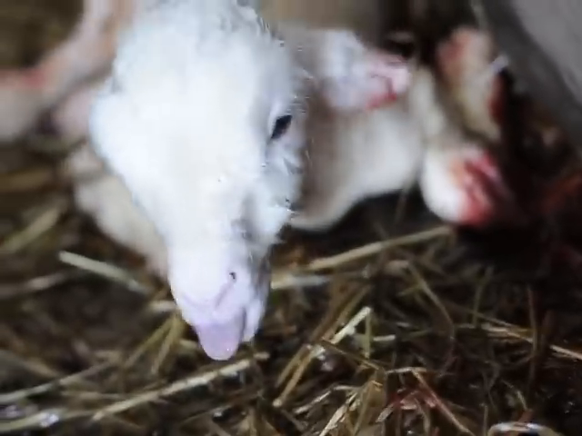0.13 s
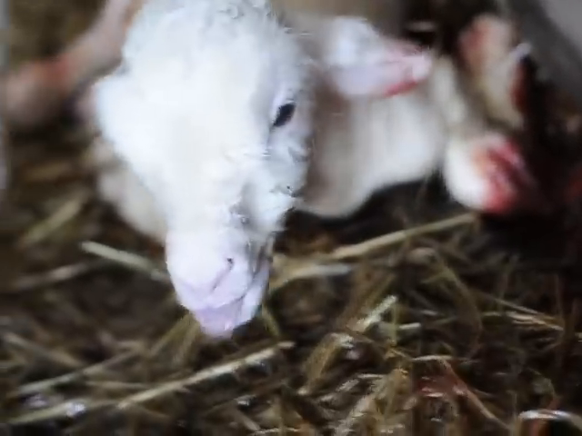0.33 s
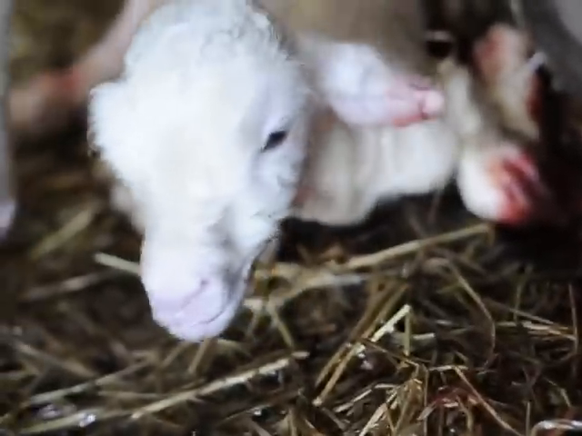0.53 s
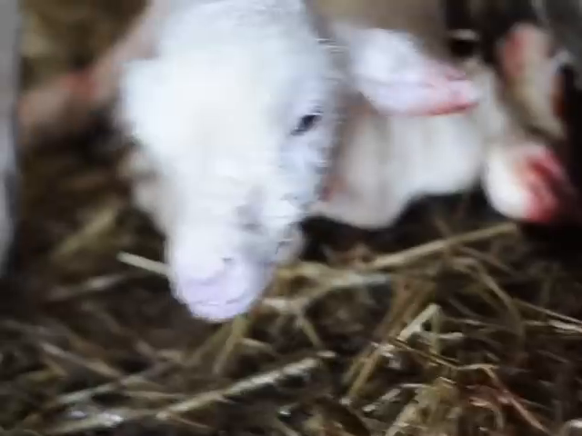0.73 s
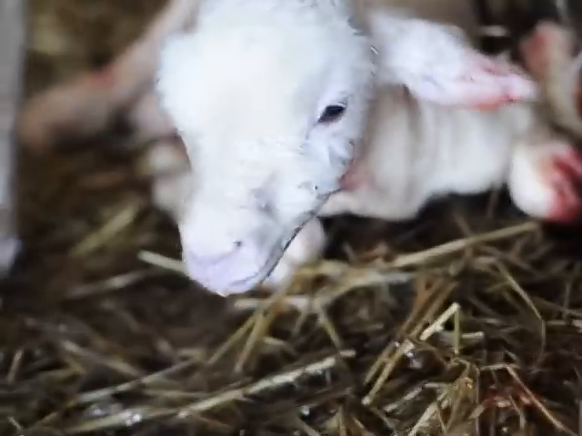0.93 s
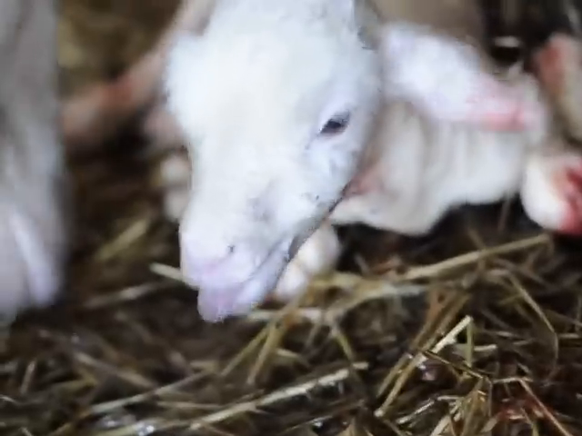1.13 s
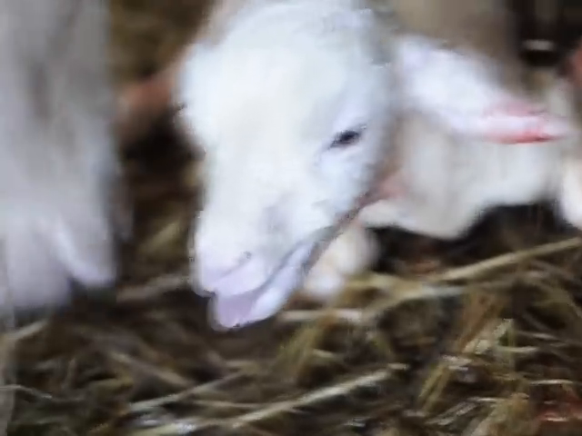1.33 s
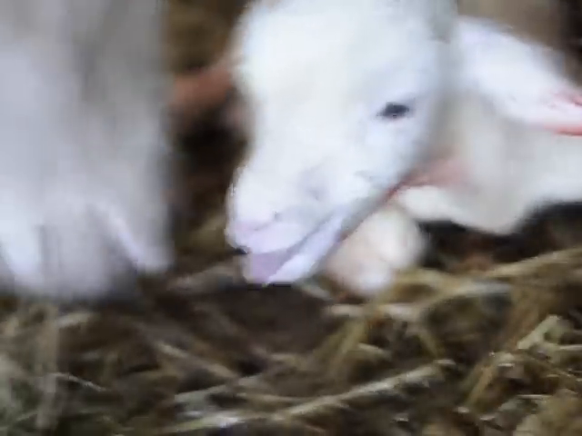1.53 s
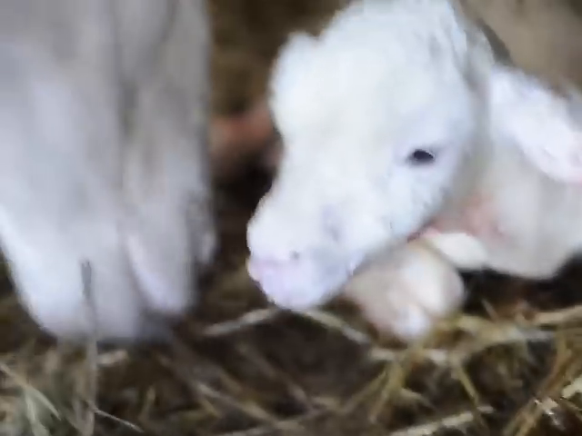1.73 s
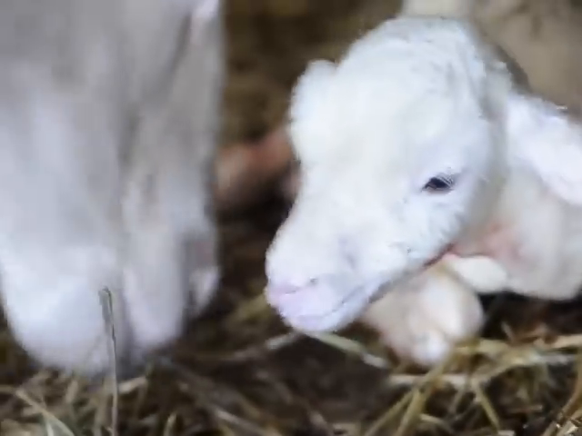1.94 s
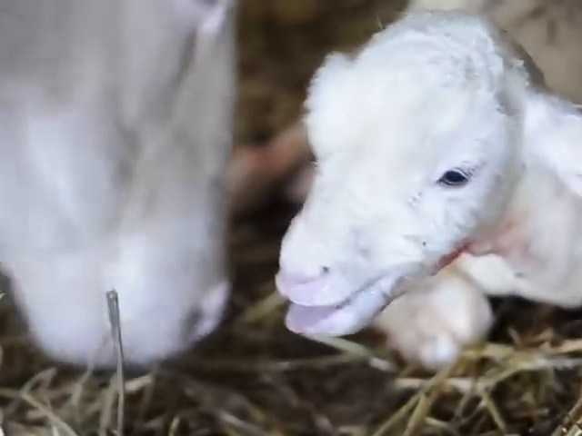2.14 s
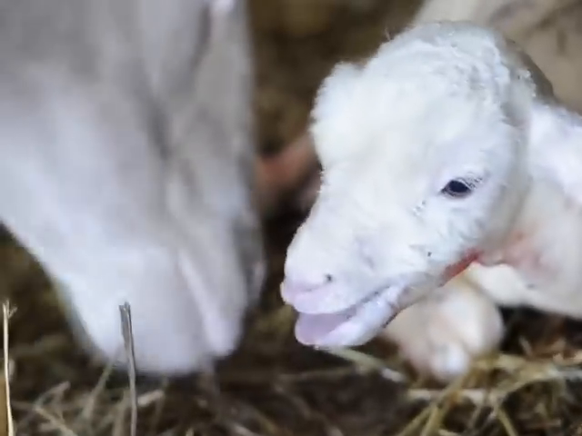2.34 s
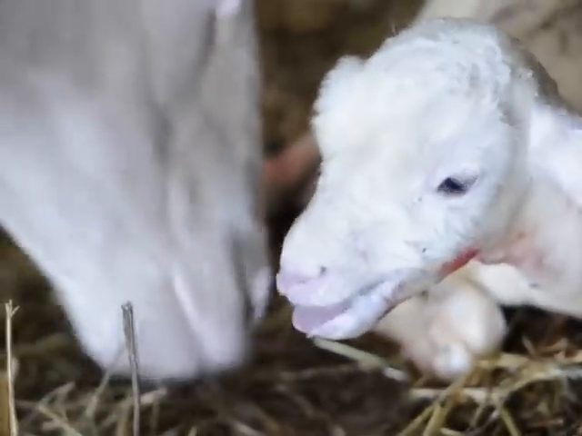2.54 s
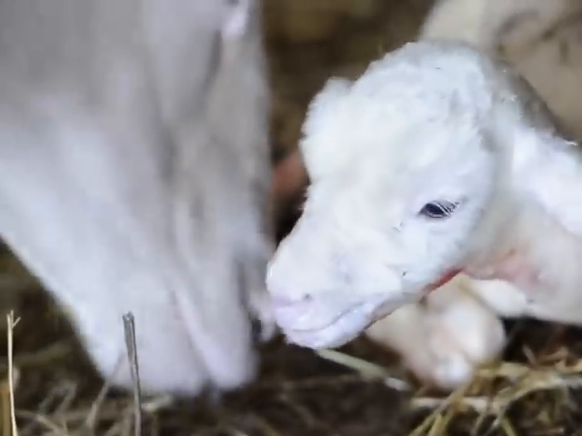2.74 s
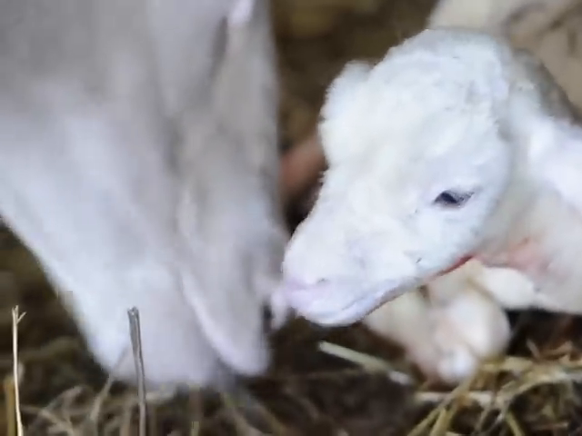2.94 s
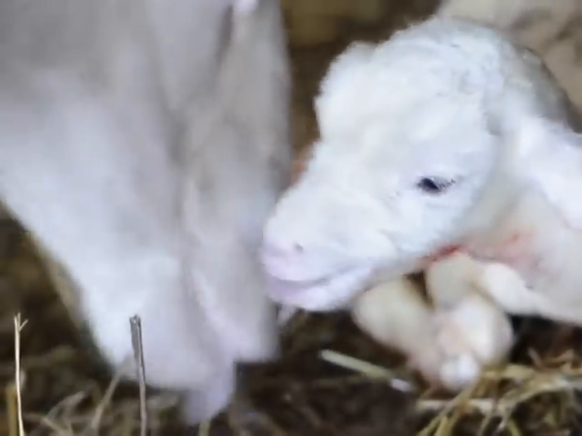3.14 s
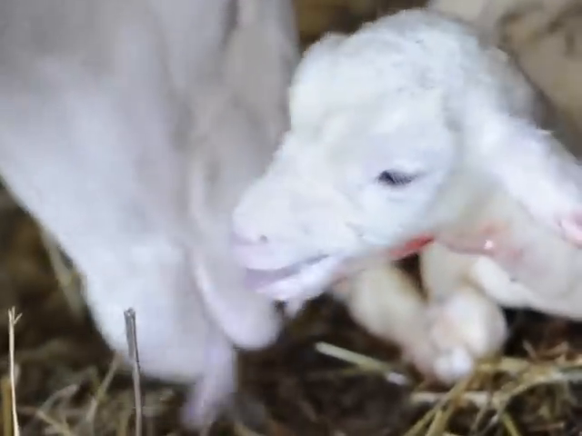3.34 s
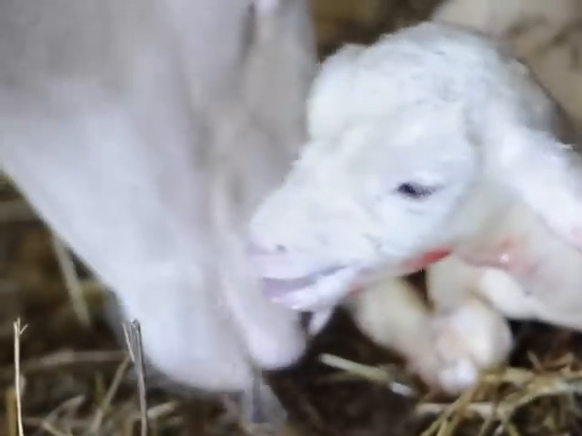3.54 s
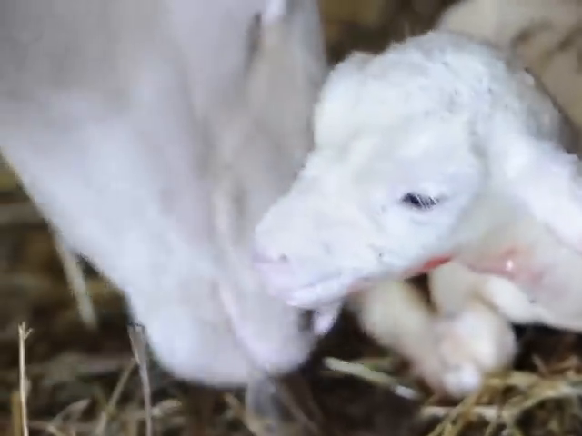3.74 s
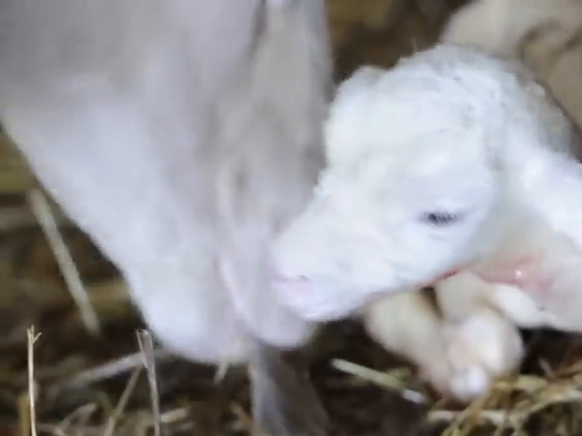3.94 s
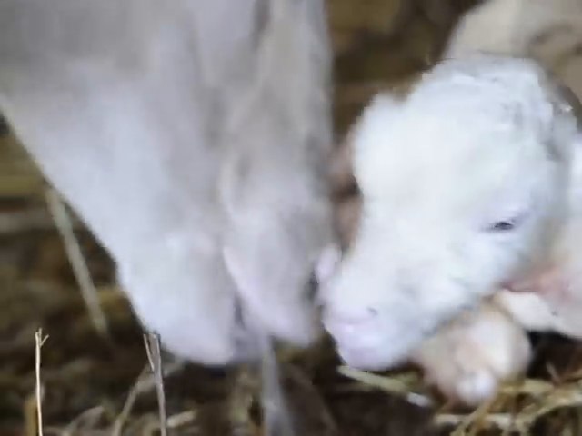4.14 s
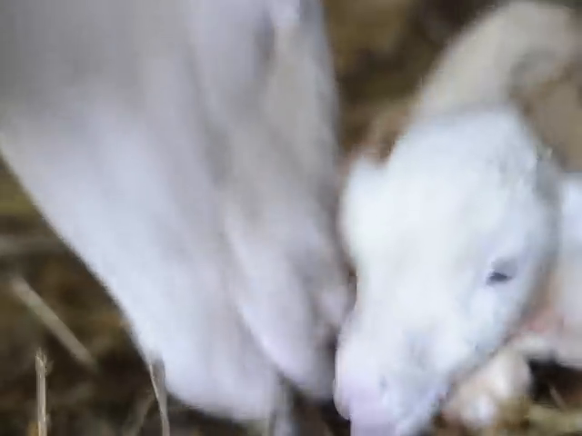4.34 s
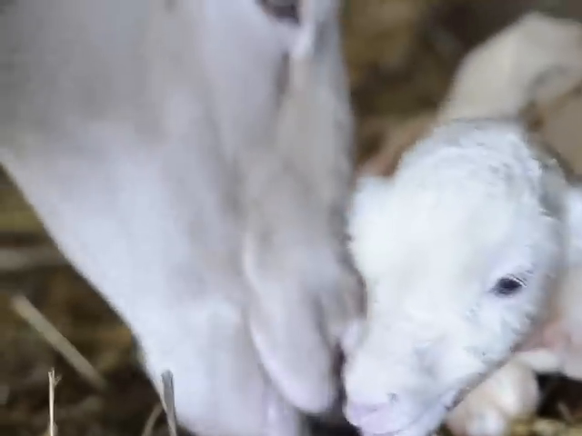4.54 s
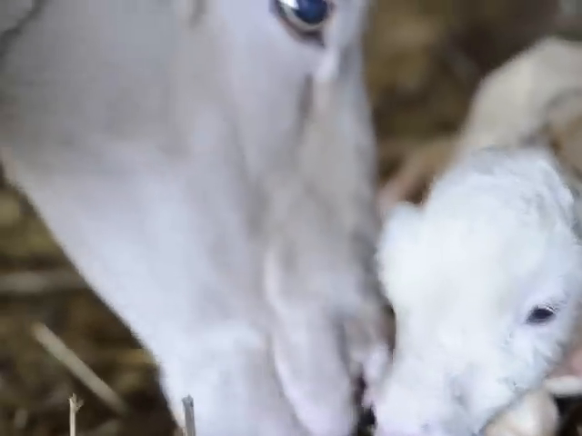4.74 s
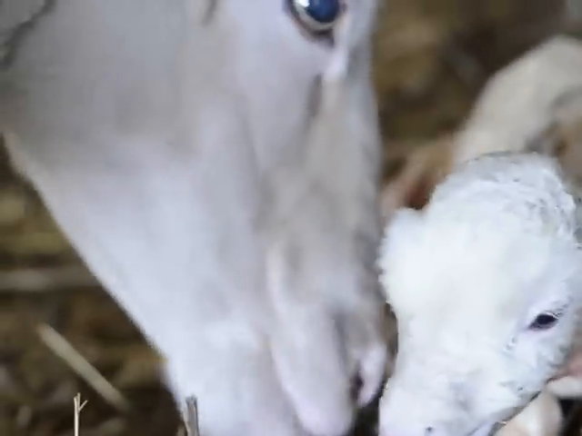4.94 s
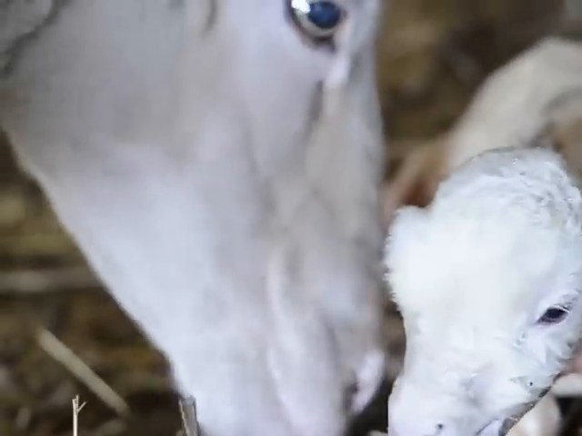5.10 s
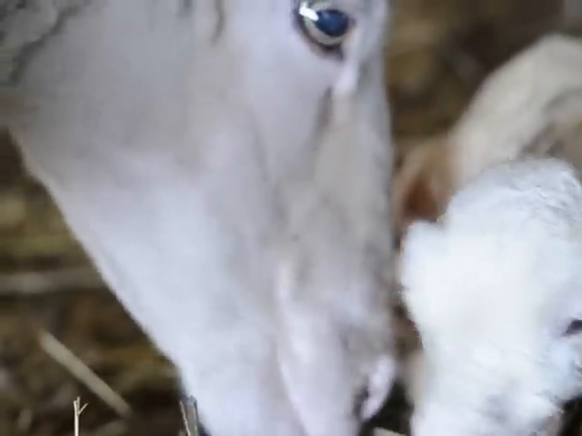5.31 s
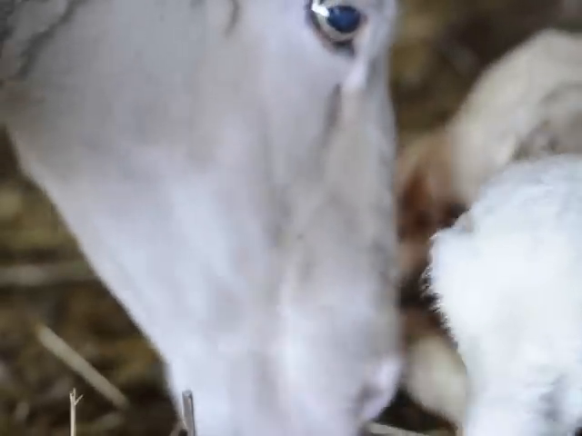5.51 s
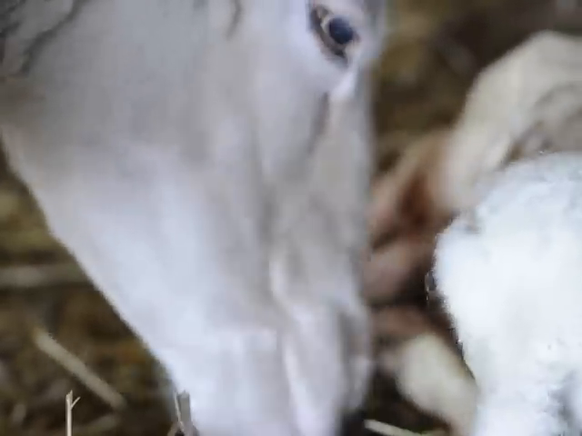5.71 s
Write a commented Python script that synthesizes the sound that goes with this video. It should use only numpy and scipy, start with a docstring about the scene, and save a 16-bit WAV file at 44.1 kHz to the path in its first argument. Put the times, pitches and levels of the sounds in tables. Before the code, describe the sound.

A close, centred view of a newborn lamb in a straw-floored barn, over quiet, dull noise that gently swells. The lamb is bleating at the start, a short cry until 0.35 seconds, fuller and lower in colour than the rest. Five more follow at about 1.05-1.6, 1.95-2.6, 2.95-3.6, 4.1-4.5 and 4.85-5.55 seconds. Each is high, around 400 to 440 hertz, nearly steady but slightly arched, bright and nasal, with creaky edges and breathy hiss. Wet mouth smacks and crisp snaps cluster at 0.4 and 0.85-0.9 seconds, then come lightly between bleats, around 1.7, 2.7, 2.9, 3.8, 4.6 and 5.7. Soft straw scuffs and fine crackle swell briefly around them. From 4.0 to 4.75 seconds a distant, lower sheep bleats once, faint and echoing, breaking into a rapid quaver as it fades beneath the lamb. Near sounds are almost dry.

```python
"""A barn: a newborn lamb lies in the straw and bleats six times, close by, over dull background noise.
Each bleat is an arched pulse train through a bright throat, rough as the voice starts and stops;
its breath hiss swells, or once thins slightly, around a set time. Straw rustles in filtered crackle and
mouths smack in short noise bursts as the ewe nuzzles the lamb. Far off, another sheep's lower pulse train
quavers once."""
import sys
import numpy as np
from scipy import signal
from scipy.fft import rfft, irfft
from scipy.io import wavfile
from scipy.ndimage import uniform_filter1d, map_coordinates

SR = 44100
rng = np.random.default_rng(int(sys.argv[2]) if len(sys.argv) > 2 else 0)


def to_wav(sig):
    """Store sig (one row per channel, or 1-D mono) as 16-bit WAV at the path in sys.argv[1].

    Samples outside -1..1 are clipped; the rate is SR.
    """
    pcm = np.clip(np.atleast_2d(sig), -1, 1) * 32767
    pcm = np.round(pcm).astype(np.int16)
    wavfile.write(sys.argv[1], SR, pcm.T)  # frames by channels


N = 254309

# bounds of the throat's five regions: [f/Hz]
REGION_EDGES_HZ = [1450, 2350, 4450, 6700]


def gain_of(db):
    """Decibels to gain."""
    return 10 ** (np.asarray(db) / 20)


def evened(x):
    """Scales to rms 1."""
    return x / np.sqrt(np.mean(x ** 2) + 1e-20)


def read(points, hz):
    """A spectrum's value at hz, on a log-frequency axis."""
    f, value = np.transpose(points)
    return np.interp(np.log(hz + 1), np.log(f + 1), value)


def follow(rows, t):
    """The columns of a curve table at times t."""
    s, *columns = np.transpose(rows)
    return [np.interp(t, s, column) for column in columns]


def add(mix, s, sound):
    """Adds a sound to the mix at time s."""
    part = mix[max(round(s * SR), 0):][:len(sound)]
    part += sound[:len(part)]


def bump(t, at_s, width_s):
    """A smooth swell of height 1 around at_s."""
    return np.exp(-((t - at_s) / width_s) ** 2)


def drift(size, hz):
    """Smooth chance of rms about 1, with a Gaussian roll-off at hz."""
    f = np.fft.rfftfreq(N, 1 / SR)
    spectrum = rfft(rng.standard_normal(N)) * np.exp(-(f / hz) ** 2)
    return evened(irfft(spectrum, N))[:size]


def waver(size, count, per_s):
    """Unrelated smooth wanderings through random knots, per_s knots a second."""
    knots = rng.standard_normal((count, int(N / SR * per_s) + 4))
    steps = np.arange(0, size + 200, 200)
    at_knot = [steps / SR * per_s]
    curves = [map_coordinates(row, at_knot, order=3, mode="nearest") for row in knots]
    return [np.interp(np.arange(size), steps, curve) for curve in curves]


def colour(x, points, size=4096):
    """Minimum-phase filter with the given spectrum: each pulse rings after it strikes."""
    log_gain = np.log(gain_of(read(points, abs(np.fft.fftfreq(size, 1 / SR)))))
    ring = np.fft.ifft(np.exp(np.conj(signal.hilbert(log_gain)))).real
    return signal.oaconvolve(x, ring[:size // 2])[:len(x)]


def band(x, lo_hz, hi_hz, order=2):
    """Band-pass, rms 1."""
    edges_hz = [lo_hz, min(hi_hz, SR / 2 - 1)]
    return evened(signal.sosfilt(signal.butter(order, edges_hz, "band", fs=SR, output="sos"), x))


def background(floor_db=-59.5, low_db=-2.0, high_db=-1.0):
    """Dull barn noise: the part below 700 Hz swells and sinks, the rest less so."""
    # spectrum: [f/Hz, relative density/dB per Hz]
    floor = [(20, -4), (40, -9.5), (62, -8.5), (150, -5), (250, -10.5), (450, -10.5), (800, -14),
             (1500, -18), (2000, -18.5), (3000, -20.5), (6000, -28), (10000, -31), (11500, -41),
             (13000, -52.5)]
    noise = gain_of(floor_db) * evened(colour(rng.standard_normal(N), floor))
    low = signal.sosfiltfilt(signal.butter(2, 700, fs=SR, output="sos"), noise)
    high = noise - low
    swell_db = 2.5 * drift(N, 9)
    return low * gain_of(low_db + swell_db) + high * gain_of(high_db + drift(N, 6))


def pulses(turns, count=36, wander=0.5, wander_per_s=8):
    """One sharp pulse a cycle; its shape wanders, so single harmonics swell and fade, high ones most."""
    along = waver(len(turns), count, wander_per_s)
    across = waver(len(turns), count, wander_per_s)
    out = 0
    for k, a, b in zip(range(1, count + 1), along, across):
        loose = wander * np.tanh(k / 10)
        angle = 2 * np.pi * k * turns
        out = out + (1 + loose * a) * np.cos(angle) + loose * b * np.sin(angle)
    return evened(out)


def hoarseness(t, creak, creak_s, rasp_db, change_s, change_db, end_creak=0.54, end_creak_s=0.014):
    """The folds creak until they catch and as they stop; the breath hiss swells or thins around change_s."""
    uncaught = bump((t - t[0]) ** 2, 0, creak_s ** 2)
    rough = creak * uncaught + end_creak * bump(t, t[-1], end_creak_s)
    return uncaught, rough, rasp_db + change_db * bump(t, change_s, 0.15)


def vowel_shares(effort_db, opening, uncaught, vowel, glide, ebb_scale_db=24):
    """Region shares/dB: weak voice is low and nasal, strong and open is bright; the vowel glides."""
    # per region, low to high: [shift as effort ebbs/dB, shift as jaw shuts/dB]
    region_shifts = [(13, 4), (15.5, -2.1), (1.6, -4.5), (-7, -3), (5.5, -0.5)]
    # shift per region, low to high, until the folds catch: [shift/dB]
    uncaught_shifts = [0.5, 2.5, -3.5, -1, -9]
    ebb = np.tanh((effort_db.max() - effort_db) / ebb_scale_db)
    late = np.linspace(-.5, .5, len(ebb))
    shares = []
    for db, glide_db, (ebb_db, shut_db), uncaught_db in zip(vowel, glide, region_shifts, uncaught_shifts):
        mouth_db = ebb_db * ebb + shut_db * (1 - opening)
        shares.append(db + glide_db * late + mouth_db + uncaught_db * uncaught)
    shares = np.array(shares)
    # the powers of the regions sum to 1
    return shares - 10 * np.log10((gain_of(shares) ** 2).sum(0))


def resonate(x, hz, width_hz):
    """A resonance of gain 1 that follows the curve hz."""
    turn = np.exp(2j * np.pi * np.cumsum(hz) / SR)
    r = np.exp(-np.pi * width_hz / SR)
    return 2 * (turn * signal.lfilter([1 - r], [1, -r], x / turn)).real


def regions(x, order=10):
    """Splits a voice into the throat's regions; they sum to the whole."""
    filters = [signal.butter(order, hz, fs=SR, output="sos") for hz in REGION_EDGES_HZ]
    below = [signal.sosfiltfilt(sos, x) for sos in filters]
    return np.diff([0 * x] + below + [x], axis=0)


def bleat(folds, effort, voicing, mouth, vowel, glide, throat, upper_throat,
          upper_db=-13, slack=2, attack_s=0.003, jitter=.0011, rough_jitter=.04,
          rough_noise=1.0, shimmer=0.52, straw_echo=0.032, flutter_db=0.57):
    """Pulses and puffs of turbulence ring the throat; its regions shift as the mouth opens."""
    # turbulence spectrum against the pulses: [f/Hz, relative level/dB]
    rasp_spectrum = [(300, -49.5), (1500, -26), (3000, -26.5), (5000, -19), (6200, -19), (7000, -11),
                     (10000, -15), (14000, -10.5)]
    # mouth's middle, high, top resonance: [width/Hz, boost/dB, f shut / f open]
    formant_shapes = [(447, 2.5, 0.7), (450, -8, 0.78), (698, 2.5, .86)]
    t = np.arange(effort[0][0], effort[-1][0], 1 / SR)
    n = len(t)
    hz, = follow(folds, t)
    effort_db, = follow(effort, t)
    uncaught, rough, rasp_db = hoarseness(t, *voicing)
    widest_s, jaw_s, *formants_hz = mouth
    opening = bump(t, widest_s, jaw_s)
    shares_db = vowel_shares(effort_db, opening, uncaught, vowel, glide)

    # the folds run steadily in mid-call and stumble at either end
    slow_jitter = jitter * drift(n, 39)
    fast_jitter = (jitter + rough_jitter * rough) * drift(n, 230)
    turns = np.cumsum(hz * (1 + slow_jitter + fast_jitter)) / SR
    puffs = evened((0.9 + np.exp(-(turns % 1) / 0.84)) * rng.standard_normal(n))
    rasp = colour(puffs, rasp_spectrum) * gain_of(rasp_db + 2 * drift(n, 23))
    drive = pulses(turns) * (1 + shimmer * rough * drift(n, 160)) + rasp + rough_noise * rough * puffs
    # slack folds flap softly, which strengthens the fundamental
    drive = drive + slack * rough * np.cos(2 * np.pi * turns)

    shape = [(k * np.median(hz), db) for k, db in throat]
    upper = [(f, db + upper_db) for f, db in upper_throat if f > REGION_EDGES_HZ[-1]]
    voice = colour(drive, [(120, shape[0][1] - 22)] + shape + upper)
    # the resonances rise as the jaw opens and sink as it closes
    for open_hz, (width_hz, boost_db, shut) in zip(formants_hz, formant_shapes):
        formant_hz = open_hz * (shut + (1 - shut) * opening)
        voice = voice + gain_of(boost_db) * resonate(voice, formant_hz, width_hz)
    # a reflection off the ground shifts with the head, so single harmonics swell and fade
    lag = (0.00159 + .00007 * drift(n, 7.3)) * SR  # samples
    voice = voice + straw_echo * map_coordinates(voice, [np.arange(n) - lag], order=3)

    # each region is levelled, then set by effort and share
    out = np.zeros(n)
    for part, share_db in zip(regions(voice), shares_db):
        strength = np.sqrt(abs(uniform_filter1d(part ** 2, size=1100)) + 1e-12)
        out += part / strength * gain_of(effort_db + share_db + flutter_db * drift(n, 30))
    return t[0], out * (1 - np.exp(-(t - t[0]) / attack_s)) * signal.windows.tukey(n, .012)


def lamb():
    """Six bleats, each with its own folds, effort, mouth and throat."""
    # vocal folds, one table a bleat: [t/s, pitch before jitter/Hz]
    folds = [
        [(0.008, 412.4), (0.092, 409.3), (0.2, 415), (0.304, 400.8), (0.328, 388.5), (0.34, 387)],
        [(1.05, 395), (1.062, 383), (1.098, 408.6), (1.172, 417.6), (1.37, 429.7), (1.474, 426.6),
         (1.542, 420.3), (1.582, 405.4), (1.595, 400.6)],
        [(1.968, 397), (1.972, 397), (2.018, 422.2), (2.11, 421.1), (2.156, 427.8), (2.31, 433.9),
         (2.518, 419.2), (2.568, 403)],
        [(2.975, 370), (2.993, 372), (3.005, 392.5), (3.043, 411.2), (3.187, 426.6), (3.403, 425.9),
         (3.469, 429), (3.527, 421.6), (3.588, 395.3)],
        [(4.1, 382.4), (4.112, 378.5), (4.16, 409), (4.254, 424.9), (4.37, 428), (4.408, 424.4), (4.485, 391)],
        [(4.848, 399), (4.856, 394), (4.884, 413.4), (4.924, 421.7), (5.078, 434.4), (5.264, 439.6),
         (5.332, 432.8), (5.442, 436), (5.506, 421), (5.545, 387.5)],
    ]
    # how hard the lamb pushes, one table a bleat: [t/s, effort/dB]
    efforts = [
        [(0.0, -19.5), (0.012, -24), (0.198, -20), (0.276, -23.5), (0.34, -31), (0.353, -45)],
        [(1.031, -32), (1.033, -49), (1.173, -22), (1.251, -16), (1.351, -17.5), (1.561, -28), (1.591, -29.5),
         (1.613, -54)],
        [(1.954, -41), (1.96, -42), (1.99, -32), (2.072, -20.5), (2.192, -16.5), (2.272, -16.5), (2.568, -28.5),
         (2.579, -33)],
        [(2.964, -56), (2.972, -45.5), (3.096, -24.5), (3.204, -18.5), (3.332, -18.5), (3.404, -21.5),
         (3.486, -20.5), (3.582, -25.5), (3.594, -34), (3.6, -28)],
        [(4.078, -48.5), (4.2, -29.5), (4.228, -25), (4.298, -20), (4.402, -17.5), (4.476, -27), (4.498, -42)],
        [(4.833, -43.5), (4.875, -30), (4.903, -28.5), (4.937, -18.5), (5.009, -14.5), (5.173, -14),
         (5.481, -18), (5.533, -22.5), (5.561, -43)],
    ]
    # voice: [opening creak/0-1, creak length/s, turbulence/dB, t of change/s, change of turbulence then/dB]
    voices = [(0.046, 0.04, -2.5, 0.37, 8), (0.653, .068, -0.5, 1.48, 5.5), (0.699, .026, -2, 2.38, 7.5),
              (.35, 0.058, 2.5, 3.52, -1.5), (.35, .06, 1.5, 4.17, 10.5), (0.771, .018, -1, 5.44, 5)]
    # mouth: [t widest/s, opening or closing time/s, then middle, high, top resonance when widest f/Hz]
    mouths = [(.19, 0.16, 2770, 6600, 7500), (1.38, 0.23, 3540, 6200, 9600), (2.26, 0.33, 3210, 5180, 7820),
              (3.33, 0.41, 3880, 4860, 8100), (4.34, 0.22, 3900, 6800, 8400),
              (5.13, 0.31, 4670, 5650, 8600)]
    # vowel at full effort before normalising: [share of each of five regions, low to high/dB]
    vowels = [(-5.5, -15, -5.5, -6.5, -12), (-15, -16.5, -6.5, -1.2, -17), (-17, -13, -3.5, -3.5, -15),
              (-18, -12.5, -5, -6.5, -19.5), (-16.5, -14, -6.5, -0.6, -17),
              (-16.5, -14.5, -5.5, -.5, -18.5)]
    # vowel glide, start to end: [change of each region, low to high/dB]
    glides = [(0.5, 2, 0, -6, -8.5), (1.5, 11, .8, -3.1, 4), (0.4, 8, -0.5, -4, -1.7),
              (0.5, 13.5, -4.5, 2, -6), (4.5, 13, -7, 3.5, -2.5), (-0.7, 7.5, -5.5, 3.5, -13)]
    # throat shape, one table a bleat: [harmonic number, relative level/dB]
    throats = [
        [(1, -7), (2, 8.5), (3, 7.5), (4, -11), (5, -13), (6, -10.5), (7, -1.5), (8, -17), (9, -5.5), (10, -5),
         (11, -13), (12, -22.5), (13, -26.5), (14, -17), (15, -28.5)],
        [(1, -23), (2, -8), (3, -7), (4, -11), (5, -21), (6, -8), (7, 0.5), (8, -2.5), (9, 5), (10, -3.5),
         (11, 8), (12, 3), (13, 4.5), (14, 5.5), (15, -5)],
        [(1, -25), (2, -9.5), (3, -13.5), (4, -10), (5, -22), (6, -8.5), (7, -1.5), (8, 4.5), (9, 10), (10, 3),
         (11, 2.5), (12, 1), (13, -1.5), (14, -2.5), (15, -24.5)],
        [(1, -10.5), (2, 2), (3, -3.5), (4, -9), (5, -23), (6, -8), (7, -9.5), (8, -6), (9, -1.5), (10, -5.5),
         (11, -1), (12, 4), (13, -10), (14, -6.5), (15, -18)],
        [(1, -7), (2, 3.5), (3, 1), (4, -15), (5, -18.5), (6, -12), (7, -21), (8, -14.5), (9, -15.5), (10, -12),
         (11, -4), (12, 1.5), (13, -1), (14, -0.5), (15, -13)],
        [(1, -23.5), (2, -8), (3, -9), (4, -15.5), (5, -19), (6, -9), (7, -16), (8, -3), (9, -6.5), (10, -4.5),
         (11, 4), (12, 1.5), (13, 3), (14, 6), (15, -11)],
    ]
    # upper throat, one table a bleat, used above the last region edge: [f/Hz, level before upper_db/dB]
    upper_throats = [
        [(3940, -48), (6700, -18), (6980, -5), (7170, -24), (7420, -1), (7780, 1), (8980, -20.5), (9520, -16),
         (10200, -21), (11700, -19.5), (13500, -46)],
        [(3940, -38), (6700, -8), (7400, -16.5), (7670, 3.5), (8130, -6.5), (9390, -7), (9890, -5),
         (10500, -17.5), (11100, -4.5), (11800, -17.5), (13500, -21)],
        [(3940, -48), (6700, -18), (7780, -2), (8060, -9.5), (8670, -7), (9410, -24), (10300, -8),
         (10800, -9.5), (11500, -19.5), (13100, -18.5), (13500, -42.5)],
        [(3940, -28), (6700, 2), (7230, -9), (7690, -11), (7870, -6), (8150, -18), (9550, -22), (10100, -14.5),
         (10700, -15.5), (10900, -9.5), (13500, -40)],
        [(3940, -41), (6700, -11), (7450, -16), (7710, 5.5), (8320, -24.5), (8570, -5), (9200, -15), (9870, -6),
         (10500, -16), (12800, -15.5), (13500, -29)],
        [(3940, -46), (6700, -16), (7380, -2), (8230, -13.5), (8750, -0.5), (9550, -8), (10100, -3.5),
         (10500, -6), (11800, -20), (12700, -12), (13500, -25.5)],
    ]
    out = np.zeros(N)
    for call in zip(folds, efforts, voices, mouths, vowels, glides, throats, upper_throats):
        add(out, *bleat(*call))
    return out


def crackle(per_s, spread_db):
    """Tiny snaps of uneven size at random moments, rms 1."""
    size_db = spread_db * np.minimum(rng.exponential(1, N), 4)
    struck = rng.random(N) < per_s / SR
    return evened(rng.standard_normal(N) * gain_of(size_db) * struck)


def straw(scuff_db=-5, hiss_db=-3):
    """Soft scuffs and a fine hiss of stalks: each shift of the animals swells and dies away."""
    # shifts: [t of peak/s, rise/s, decay/s, dull scuff before scuff_db/dB, fine hiss before hiss_db/dB]
    shifts = [(.41, .06, .015, -53, -63), (.615, 0.037, 0.022, -45.5, -64), (.69, 0.051, .11, -61, -52.5),
              (.92, 0.044, 0.064, -51, -71.5), (1.02, 0.038, .03, -59.5, -68.5),
              (1.78, 0.061, 0.093, -61.5, -65), (2.6, .05, 0.075, -63, -61), (2.75, .07, 0.033, -61.5, -70),
              (2.95, .015, .03, -74.5, -59), (3.82, 0.097, .05, -61.5, -68), (3.96, 0.044, .2, -71, -63),
              (4.77, .09, .05, -54, -68), (5.69, .02, .18, -61, -60.5)]
    t = np.arange(N) / SR
    low, high = np.zeros((2, N))
    for s, rise_s, decay_s, low_db, high_db in shifts:
        swell = np.where(t < s, bump(t, s, rise_s), np.exp(-abs(t - s) / decay_s))
        low = low + swell * gain_of(low_db + scuff_db)
        high = high + swell * gain_of(high_db + hiss_db)
    scuff = band(crackle(2500, 1.8), 240, 3000) + 1.3 * band(crackle(600, 1.5), 250, 520)
    hiss = band(crackle(15000, 1.7), 3800, 10500, order=5)
    return evened(scuff) * low + hiss * high


def smacks(pop_hz=520, pop_s=0.0083, snap_s=0.003, top_s=0.0018, rise_s=0.0012,
           pops_db=8, snaps_db=7, tops_db=6):
    """Mouth smacks and straw snaps: a snap with a crisp top; wet ones also ring the mouth's hollow."""
    # levels before pops_db, snaps_db, tops_db: [t/s, wet low pop/dB, snap/dB, crisp top/dB]
    contacts = [(.386, -55, -57, -62), (.402, -49.5, -41, -46), (.414, -50, -52, -60), (.43, -64, -54, -53),
                (.627, -66, -50, -46.5), (.848, -60, -49, -49), (.86, -63, -51, -56), (0.9, -43, -47, -60),
                (.92, -55.5, -60, -55), (1.624, -59.5, -47, -44.5), (1.7, -71, -54, -47),
                (1.768, -69, -66, -48.5), (1.928, -69.5, -64, -59), (2.058, -55, -62, -68),
                (2.094, -56.5, -62, -66), (2.278, -53, -60, -66), (2.643, -70, -50.5, -62),
                (2.704, -72, -64, -41.5), (2.88, -77.5, -53, -48), (2.956, -67, -53, -49.5),
                (3.686, -78.5, -74, -41.5), (3.838, -75, -67, -48.5), (3.908, -72, -57.5, -52),
                (3.938, -73, -71, -57), (4.628, -61, -47, -56), (5.667, -55.5, -50.5, -54)]
    out = np.zeros(N)
    t = np.arange(SR // 12) / SR
    for s, pop_db, snap_db, top_db in contacts:
        a, b, c = rng.standard_normal((3, len(t)))
        tone = np.sin(2 * np.pi * pop_hz * rng.uniform(.93, 1.07) * t)
        hollow = tone + 1.1 * band(a, 330, 570)
        pop = hollow * np.exp(-t / pop_s) * (1 - np.exp(-t / 0.0025)) * gain_of(pop_db + pops_db)
        snap = band(b, 1500, 2380) * np.exp(-t / snap_s) * gain_of(snap_db + snaps_db)
        top = band(c, 4100, 8200) * np.exp(-t / top_s) * gain_of(top_db + tops_db)
        add(out, s, pop + (snap + top) * (1 - np.exp(-t / rise_s)))
    return out


def far_sheep(quaver_hz=12.2, crest_s=4.5, attack_s=0.093, release_s=.03):
    """A lower bleat, one arch of pitch, that breaks into a quaver of level and pitch as it fades."""
    # throat: [f/Hz, relative level/dB]
    far_throat = [(320, -11), (650, -16.5), (980, 4.5), (1350, -16), (1900, -15.5), (2650, 2.5),
                  (3200, -11), (3900, 1), (4900, -8.5), (6000, -19.5), (9000, -31.5)]
    start_s, end_s, arch_crest_s, arch_hz = 3.975, 4.76, 4.29, 341.7
    scoop, sag = 0.18, .1  # share of the pitch lost at the start and at the end
    start_db, fade_db_per_s = -43.5, 16.5
    start_depth, depth_per_s = .15, 1.5  # the quaver deepens up to 1
    t = np.arange(start_s, end_s, 1 / SR)
    age = t - t[0]
    hz = arch_hz * (1 - np.interp(t, [t[0], arch_crest_s, t[-1]], np.sqrt([scoop, 0, sag])) ** 2)
    depth = np.minimum(start_depth + depth_per_s * age, 1)
    ramps = np.minimum(age / attack_s, 1) * np.minimum((t[-1] - t) / release_s, 1)
    level = gain_of(start_db - fade_db_per_s * age) * ramps
    cycle = 2 * np.pi * quaver_hz * (t - crest_s)
    # the pitch dips as each throb falls and lifts as it rises
    turns = np.cumsum(hz * (1 - 0.022 * depth * np.sin(cycle) + 0.0043 * drift(len(t), 102))) / SR
    breathy = pulses(turns) + 0.42 * rng.standard_normal(len(t))
    voice = evened(colour(breathy, far_throat))
    out = np.zeros(N)
    add(out, t[0], voice * level * (1 + depth * np.cos(cycle)))
    return out


def barn(x, decay):
    """Sparse reflections of random sign, each band dying at its own speed."""
    size = SR // 2
    struck = (rng.random(size) < 2500 / SR) * (np.arange(size) > .003 * SR)
    taps = rng.choice([-1., 1.], size) * struck
    hz, t, z = signal.stft(taps, SR, nperseg=256)
    tail = signal.istft(z * gain_of(-60 * t / read(decay, hz)[:, None]), SR)[1]
    return signal.fftconvolve(x, tail / np.linalg.norm(tail))[:N]


def scene():
    """The near sounds are almost dry, the far sheep has more echo; both channels are alike."""
    # quick scatter from the pen and the ewe's body: [f/Hz, t60/s]
    pen_decay = [(300, .11), (2000, .12), (5000, .12), (12000, .11)]
    # the barn's decay: [f/Hz, t60/s]
    barn_decay = [(300, 0.59), (1500, 0.3), (5000, 0.18), (12000, 0.067)]
    near = lamb() + smacks() + straw()
    far = far_sheep()
    near = near + gain_of(-12.5) * barn(near, pen_decay) + gain_of(-29) * barn(near, barn_decay)
    mono = near + far + 0.417 * barn(far, barn_decay) + background()
    return np.array([mono, mono])


def record(dry, edge_hz=14300):
    """The recorder's band limit: a steep linear-phase low-pass."""
    taps = signal.firwin(511, edge_hz, window=("kaiser", 9), fs=SR)
    return signal.oaconvolve(dry, taps[None], "same")


dry = scene()
out = record(dry)
to_wav(out)
```